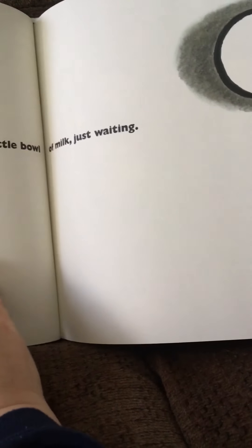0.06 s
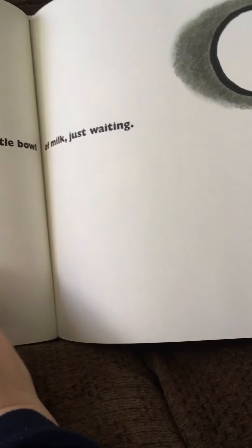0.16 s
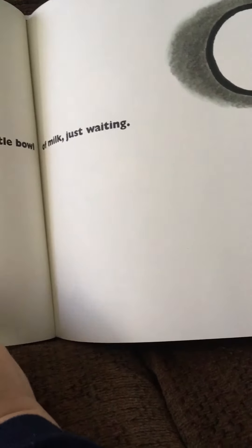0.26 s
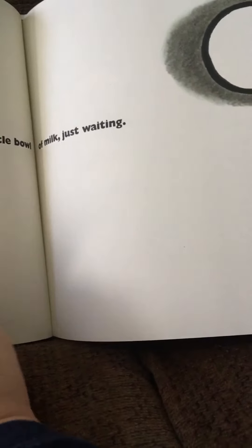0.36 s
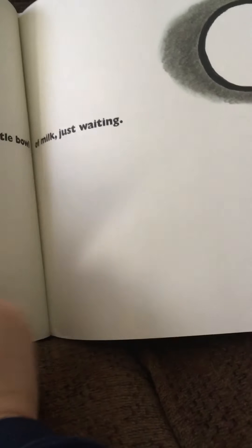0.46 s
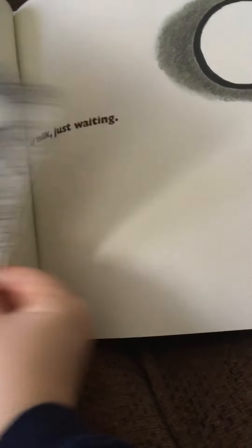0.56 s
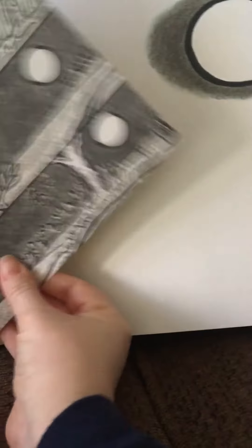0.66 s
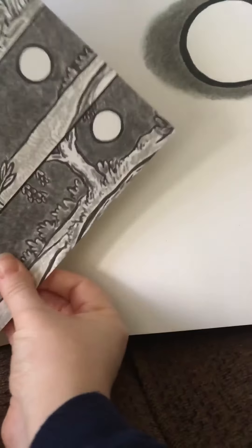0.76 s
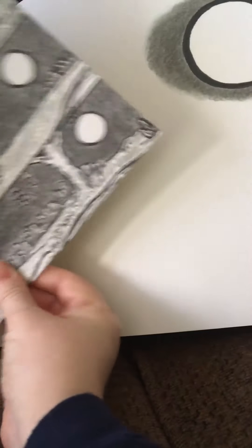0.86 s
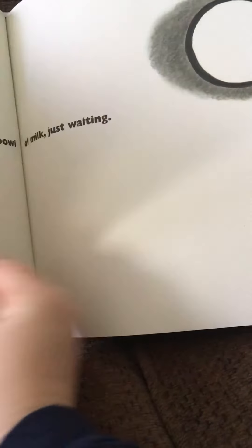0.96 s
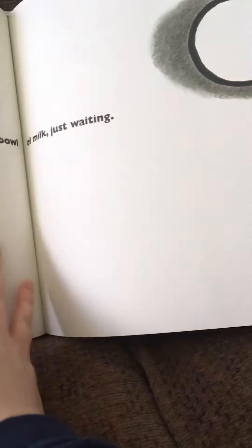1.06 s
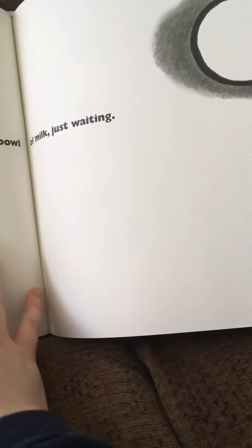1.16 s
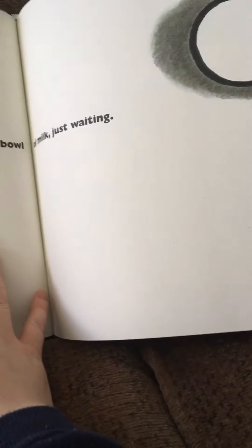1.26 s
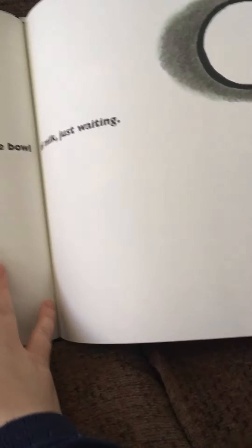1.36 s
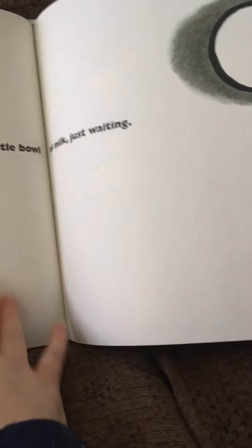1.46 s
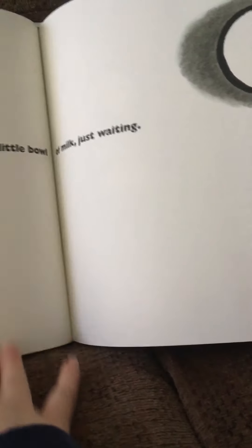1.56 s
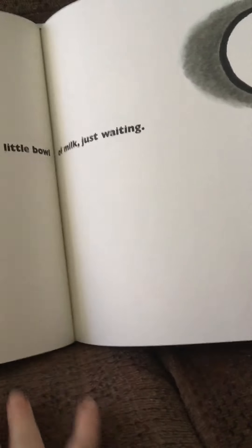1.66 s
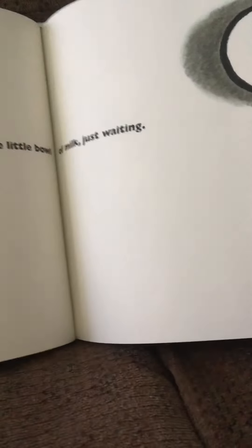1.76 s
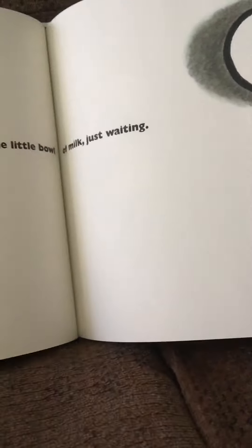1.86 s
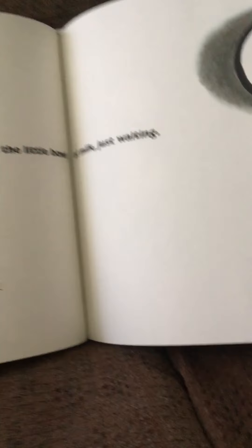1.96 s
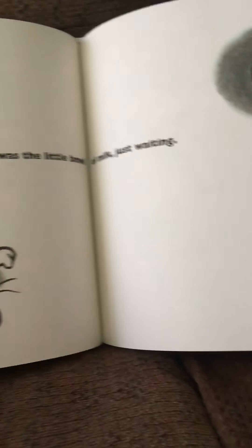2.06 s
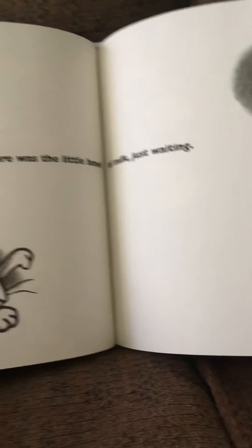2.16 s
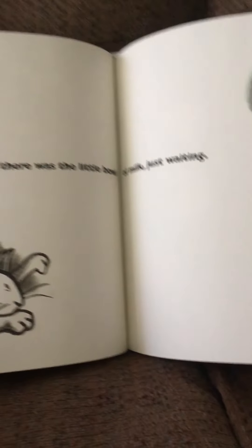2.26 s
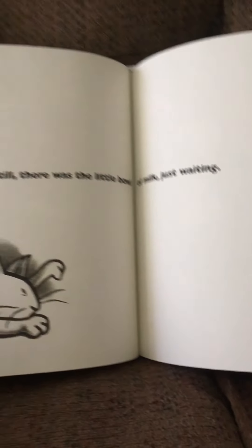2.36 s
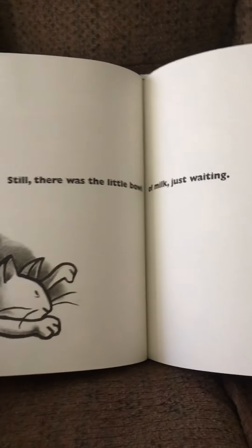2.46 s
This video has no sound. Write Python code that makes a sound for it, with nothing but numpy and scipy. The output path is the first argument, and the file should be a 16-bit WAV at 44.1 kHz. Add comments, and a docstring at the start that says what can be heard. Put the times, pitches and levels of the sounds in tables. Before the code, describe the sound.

A stiff book page is turned by hand, close by in a quiet room. It rustles, buckles with small snaps and a low puff of air, then lands with a scrape. Soft bumps and a light brushing follow.

```python
"""First comes a soft rustle: fingers slide under one stiff page of a picture book, close by.
The sheet buckles in a run of snaps, pushes the air as it sweeps over, and lands with a scrape.
Then the hand brushes along the paper and the book settles with soft bumps, in a quiet, furnished room.
Rubbing is hiss mixed with tiny slips; snaps and bumps are short tones and noise that die away fast."""
import sys
import numpy as np
from scipy import signal
from scipy.fft import rfft, irfft
from scipy.io import wavfile
from scipy.ndimage import uniform_filter1d

SR = 44100
rng = np.random.default_rng(int(sys.argv[2]) if len(sys.argv) > 2 else 0)


def transcribe(u):
    """Save the signal u as a 16-bit wav file named by the first command-line argument.

    u: samples, shape (n,) or (channels, n), limited to [-1, 1]; the rate is SR.
    q: integer samples, one column per channel.
    """
    v = np.clip(np.atleast_2d(u).T, -1, 1)
    q = np.round(v * 32767).astype(np.int16)
    wavfile.write(sys.argv[1], SR, q)


N = 110250  # 2.5 seconds
T = np.arange(N) / SR


def amp(db):
    """Turns decibels (dB) into a number to multiply by."""
    return 10 ** (np.asarray(db) / 20)


def unit(x):
    """Scales a signal to an average strength (rms) of 1."""
    return x / np.sqrt(np.mean(x ** 2) + 1e-20)


def value_at(points, hz):
    """Looks up a frequency in a table, gliding between rows on a musical (log) scale."""
    row_hz, value = np.transpose(points)
    return np.interp(np.log(hz + 1), np.log(row_hz + 1), value)


def loudness_curve(points):
    """Joins rows of (seconds, dB) into a volume curve that fades out beyond both ends."""
    times, db = np.transpose(points)
    outside_s = np.maximum(times[0] - T, 0) + np.maximum(T - times[-1], 0)
    return amp(np.interp(T, times, db)) * np.exp(-outside_s / .01)


def colour(x, tone, peak_hz=1000, peak_db=0, octaves=1):
    """Shapes bass and treble by a tone table and an optional peak; the result has strength 1."""
    hz = np.fft.rfftfreq(len(x), 1 / SR)
    peak = peak_db * np.exp(-.5 * (np.log2((hz + 1) / peak_hz) / octaves) ** 2)
    return unit(irfft(rfft(x) * amp(value_at(tone, hz) + peak), len(x)))


def strike(t, rise_s, fall_s):
    """The volume curve of a hit: it jumps up to 1, then dies away."""
    shape = (1 - np.exp(-(t / rise_s) ** 2)) * np.exp(-t / fall_s)
    return shape / shape.max()


def add(mix, start, sound):
    """Mixes a sound in at a start time in seconds."""
    part = mix[max(round(start * SR), 0):][:len(sound)]
    part += sound[:len(part)]


def ring(tone, fade_times):
    """A burst of noise in which each frequency dies away at its own speed."""
    noise = colour(rng.standard_normal(16384), tone)
    hz, t, bands = signal.stft(noise, SR, nperseg=256)
    fade = amp(-60 * t / value_at(fade_times, hz)[:, None])
    return signal.istft(bands * fade, SR, nperseg=256)[1]


def friction(slip_share, slips_per_s, spread_db, flicker_db):
    """Rubbing: smooth hiss plus tiny slips of uneven size, under a flickering pressure."""
    slips = (rng.random(N) < slips_per_s / SR) * rng.choice([-1, 1], N)
    sizes = amp(spread_db * np.minimum(rng.exponential(1, N), 4))
    wobble = uniform_filter1d(uniform_filter1d(rng.standard_normal(N), size=400), size=200)
    pressure = amp(flicker_db * unit(wobble))
    hiss = np.sqrt(1 - slip_share) * rng.standard_normal(N)
    return pressure * (np.sqrt(slip_share) * unit(slips * sizes) + hiss)


# The room's background tone. Each row: frequency in Hz, relative level in dB.
RUMBLE_TONE = [(12, -40), (30, -9), (45, 0), (68, 2.5), (100, -12), (200, -9.5), (400, -21.5), (900, -25),
               (2500, -33.5), (8000, -48), (16000, -33.5)]


def room_rumble():
    """The faint, steady, low noise of a quiet room."""
    return amp(-61.5) * colour(rng.standard_normal(N), RUMBLE_TONE)


# Echoes from nearby surfaces. Each row: delay in seconds, level in dB.
ECHOES = [(.0032, -24.5), (0.01, -18.5)]
# The tone of the room's echo tail. Each row: frequency in Hz, relative level in dB.
TAIL_TONE = [(100, 1), (600, 0), (1400, -5), (3000, 1), (8000, -13.5), (16000, -4.5)]
# How long that tail lasts. Each row: frequency in Hz, seconds to fade by 60 dB.
TAIL_FADE = [(200, 0.13), (1500, 0.4), (10000, 0.24)]


def with_room_echo(x):
    """Sound bounces around the room, adding two close echoes and a weak, short tail."""
    response = ring(TAIL_TONE, TAIL_FADE)
    t = np.arange(len(response)) / SR
    response *= 1 - np.exp(-(t / 0.012) ** 2)  # the tail takes a moment to build
    response *= amp(-19) / np.linalg.norm(response)
    soft_pulse = signal.windows.hann(9)  # dulls each echo
    for delay, db in ECHOES:
        add(response, delay, amp(db) * soft_pulse / soft_pulse.sum())
    return x + signal.fftconvolve(x, response)[:N]


# The hand's strokes on the open page. Each row: time in seconds, relative level in dB.
BRUSH_LEVELS = [(1.303, -60), (1.316, -54), (1.5, -47.5), (1.65, -51.5), (1.77, -51.5), (1.9, -52.5),
                (1.99, -62.5), (2.018, -55), (2.15, -57.5), (2.22, -69), (2.32, -60), (2.39, -67),
                (2.5, -68.5)]
# Their tone. Each row: frequency in Hz, relative level in dB.
BRUSH_TONE = [(200, -2.5), (500, -8), (850, -1.5), (1400, -3), (2500, -8), (3200, -6), (4900, -9),
              (6000, -2.5), (7600, -7.5), (9200, -1.5), (10400, -5), (11700, 0.5), (14500, 0.5), (16000, 0)]


def hand_brush():
    """Skin brushing over smooth paper makes a fine, high hiss."""
    rub = friction(slip_share=0.13, slips_per_s=5000, spread_db=2, flicker_db=0.88)
    return amp(0.5) * loudness_curve(BRUSH_LEVELS) * colour(rub, BRUSH_TONE)


# Hand and page bumping the book. Each row: start in seconds, pitch in Hz, level in dB.
BUMPS = [(1.057, 103, -38), (1.137, 84, -46), (1.174, 132, -47), (1.315, 153, -47.5), (1.721, 191, -53),
         (2.17, 60.2, -57.5)]
# The tone of the puff in each bump. Each row: frequency in Hz, relative level in dB.
PUFF_TONE = [(60, -3), (300, -1), (750, 4), (1500, -21), (6000, -38)]


def book_bumps():
    """Each push on the book gives a low note that dies at once, with a dull puff."""
    out, t = np.zeros(N), np.arange(4096) / SR
    for start, hz, db in BUMPS:
        puff = amp(-9) * colour(rng.standard_normal(len(t)), PUFF_TONE)
        thud = np.sin(2 * np.pi * hz * t)
        add(out, start, amp(db) * strike(t, rise_s=0.0018, fall_s=0.0064) * (thud + puff))
    return out


# Air pushed by the sheet. Each row: time in seconds, relative level in dB.
AIR_LEVELS = [(.38, -52), (.43, -38), (.53, -71), (.57, -52), (.645, -52), (.72, -42.5), (.77, -49),
              (.81, -43.5), (.862, -62), (.9, -36), (1.02, -60.5), (1.07, -38.5), (1.115, -50.5),
              (1.27, -65)]
# Its tone. Each row: frequency in Hz, relative level in dB.
AIR_TONE = [(22, -33), (50, 1), (95, 4.5), (150, -6), (240, -4), (400, -14), (1000, -36.5), (4000, -50.5)]


def pushed_air():
    """The swinging sheet moves the air in low, lumpy gusts."""
    return amp(-4) * loudness_curve(AIR_LEVELS) * colour(rng.standard_normal(N), AIR_TONE)


# Paper sliding on paper and skin. Each row: time in seconds, relative level in dB.
SLIDE_LEVELS = [(0, -52.5), (.04, -50), (.09, -62), (.12, -58.5), (.128, -46), (.17, -49), (.235, -39),
                (.31, -38.5), (.342, -42.5), (.352, -49.5), (.385, -49.5), (.44, -41.5), (.535, -48.5),
                (.552, -54), (.58, -45.5), (.65, -54.5), (.72, -43.5), (.752, -43), (.762, -61),
                (.795, -65), (.825, -52.5), (.87, -47.5), (.915, -40.5), (.975, -37.5), (.985, -50),
                (1.008, -36), (1.016, -47), (1.11, -48), (1.14, -58), (1.23, -58), (1.29, -63)]
# Its tone. Each row: frequency in Hz, relative level in dB.
SLIDE_TONE = [(180, -34.5), (300, -5), (502, -11), (1030, 1), (1210, -4), (1930, -2.5), (2570, -8.5),
              (3460, -3), (3830, -5), (6200, -4.5), (10200, -7), (12100, -4), (16000, -5)]


def page_slide():
    """The sheet rubs over the next page and the fingers with a grainy rustle."""
    rub = friction(slip_share=0.3, slips_per_s=5000, spread_db=2.5, flicker_db=1.2)
    return amp(-1.5) * loudness_curve(SLIDE_LEVELS) * colour(rub, SLIDE_TONE)


# Short drags on the paper. Each row: start in seconds, length in seconds, level in dB,
# strongest frequency in Hz, half the spread around that frequency in octaves.
SCRAPES = [(0.227, 0.053, -45, 1490, 0.55), (0.972, 0.051, -38.5, 1350, 0.5),
           (1.035, 0.026, -35.5, 3600, 1), (1.053, 0.028, -42, 990, 0.58), (1.169, 0.13, -61, 1660, 0.74),
           (1.548, 0.12, -57, 1440, 1), (2.036, 0.073, -63.5, 865, 0.26)]


def page_scrapes():
    """A page edge or fingertip sticks and slips, making the sheet sound in one broad band."""
    out = np.zeros(N)
    base_tone = [(200, -3.5), (16000, -11.5)]  # Hz, dB
    for start, length, db, hz, half_spread in SCRAPES:
        swell = np.sqrt(np.hanning(int(length * SR)))
        rub = friction(slip_share=0.31, slips_per_s=2500, spread_db=3.5, flicker_db=0.5)
        scrape = colour(rub[:len(swell)], base_tone, hz, peak_db=29.5, octaves=2 * half_spread)
        add(out, start, amp(db) * swell * scrape)
    return out


# The sheet's buckles and taps. Each row: start in seconds, pop pitch in Hz,
# relative pop level in dB, relative crack level in dB, crease pitch in Hz.
SNAPS = [(0.3969, 990, -18.5, -29, 3460), (0.4, 1000, -19.5, -27.5, 5550), (0.4281, 1200, -17, -17.5, 3470),
         (0.4394, 1400, -23, -34.5, 3230), (0.4624, 1320, -13, -19.5, 3690),
         (0.4735, 1130, -26.5, -42, 1700), (0.5587, 1310, -10, -19, 2110), (0.586, 1120, -15, -25, 5650),
         (0.6636, 1124, -14.5, -21.5, 5660), (0.6964, 970, -20.5, -26, 7000), (0.8052, 856, -20, -51, 2160),
         (0.8774, 804, -24.5, -32.5, 9760), (0.8917, 1030, -22.5, -33, 3000),
         (0.9017, 900, -30.5, -28, 5960), (0.9851, 1350, -23, -45.5, 2280),
         (0.9959, 1490, -26.5, -32, 5430), (1.0360, 1870, -29.5, -27, 3070),
         (1.0396, 1720, -28.5, -28.5, 4960)]
# The tone of a crack. Each row: frequency in Hz, relative level in dB.
CRACK_TONE = [(300, -16.5), (1500, 10), (2700, -0.5), (3600, 7), (4700, -4), (6000, 2), (10000, -4.5),
              (13000, 1), (16000, -6.5)]
# The tone of the sheet ringing after a buckle. Each row: frequency in Hz, relative level in dB.
SHEET_TONE = [(50, -16.5), (90, -2), (150, -5), (250, -5.5), (430, -13), (680, 5.5), (1300, 0.5),
              (2200, -3.5), (4000, -23), (10000, -48.5)]
# How long it rings. Each row: frequency in Hz, seconds to fade by 60 dB.
SHEET_FADE = [(80, 0.32), (250, 0.13), (700, 0.045), (2000, 0.029), (8000, 0.013)]


def page_snaps():
    """Each buckle of the stiff sheet gives a pop, a bright crack and a short ring."""
    out, t = np.zeros(N), np.arange(2048) / SR
    pop_rise_s, pop_fall_s = 0.00045, 0.00061
    crack_rise_s, fizz_lead_s = 0.000067, 0.0011
    bass_cut = signal.butter(N=2, Wn=324, btype="high", fs=SR)  # a small buckle gives off little bass
    pitch_sag = 1 - 0.032 * (1 - np.exp(-t / pop_fall_s / 2))
    for start, pop_hz, pop_db, crack_db, crease_hz in SNAPS:
        # The pop lasts about two cycles and comes with a lower, slower bending of the sheet.
        cycles = np.cumsum(pop_hz * pitch_sag) / SR
        pop = strike(t, pop_rise_s, pop_fall_s) * np.sin(2 * np.pi * cycles)
        bend = amp(-14.5) * strike(t, pop_rise_s, fall_s=0.002) * np.sin(2 * np.pi * 643 * t)
        add(out, start, amp(pop_db) * signal.lfilter(*bass_cut, pop - bend))
        # The crack is a tiny burst of noise, and the crease rings with it.
        noise = colour(rng.choice([-1., 1.], len(t)), CRACK_TONE, crease_hz, peak_db=0.5, octaves=0.34)
        crack = strike(t, crack_rise_s, fall_s=0.00082) * noise
        crease = amp(-4) * strike(t, crack_rise_s, fall_s=0.0018) * np.sin(2 * np.pi * crease_hz * t)
        add(out, start, amp(crack_db) * (crack + crease))
        # Small fibres give way just before and after the crack.
        fizz = colour(rng.standard_normal(len(t)), CRACK_TONE, crease_hz, peak_db=0.5, octaves=0.34)
        fizz *= strike(t, rise_s=2 * fizz_lead_s, fall_s=0.0026)
        add(out, start - fizz_lead_s, amp(crack_db - 10.5) * fizz)
        add(out, start + pop_rise_s, amp(pop_db - 13) * ring(SHEET_TONE, SHEET_FADE))
    return out


def scene():
    """Room, hand and page together, the same in both ears."""
    background = room_rumble()
    short_sounds = with_room_echo(page_snaps() + page_scrapes() + book_bumps())
    mono = background + short_sounds + page_slide() + pushed_air() + hand_brush()
    return np.array([mono, mono])


def record(dry):
    """Cuts away the very highest treble, above 15850 Hz."""
    treble_cut = signal.firwin(401, 15850, window=("kaiser", 9), fs=SR)
    return signal.oaconvolve(dry, treble_cut[None], "same")


dry = scene()
out = record(dry)
transcribe(out)
```